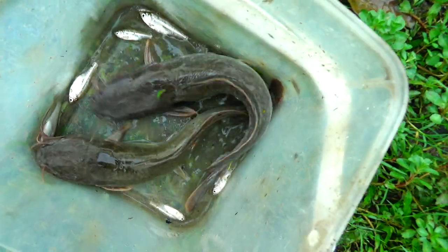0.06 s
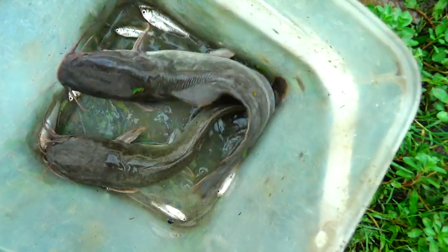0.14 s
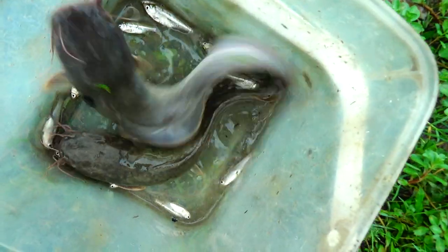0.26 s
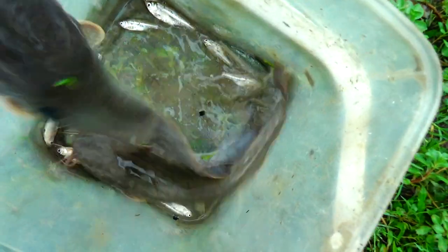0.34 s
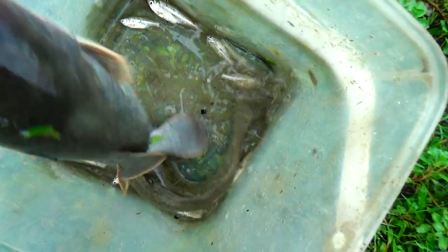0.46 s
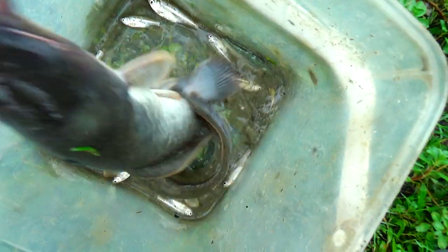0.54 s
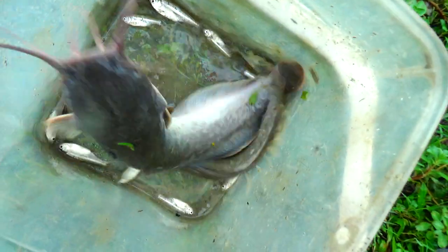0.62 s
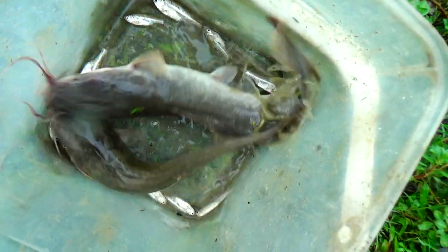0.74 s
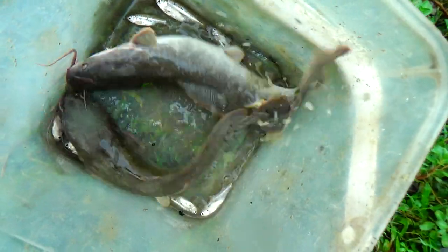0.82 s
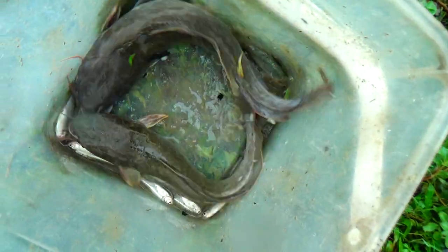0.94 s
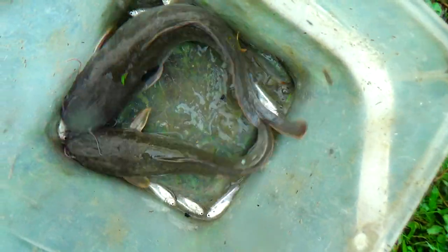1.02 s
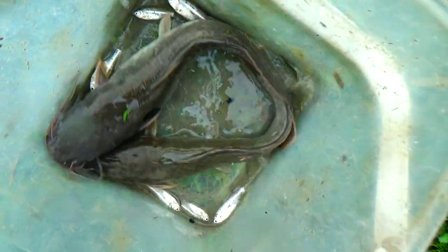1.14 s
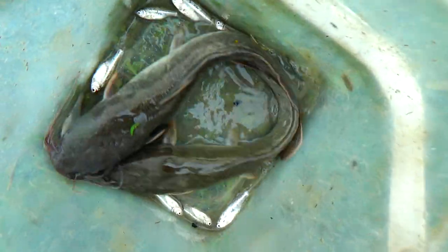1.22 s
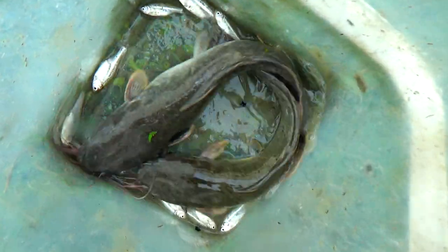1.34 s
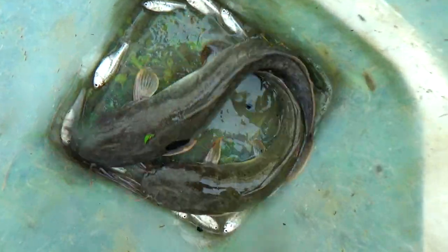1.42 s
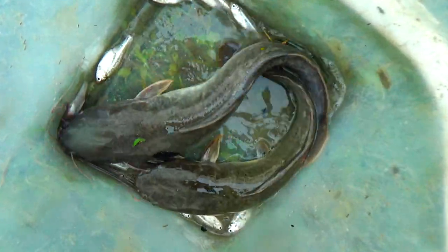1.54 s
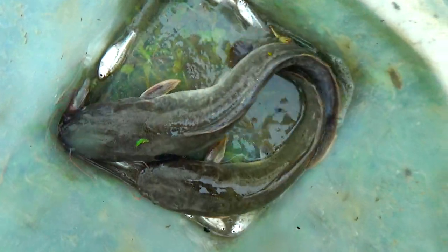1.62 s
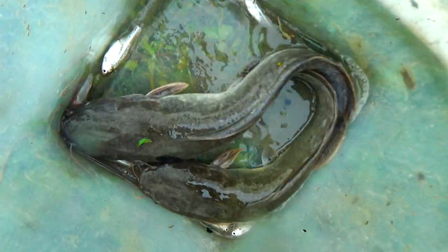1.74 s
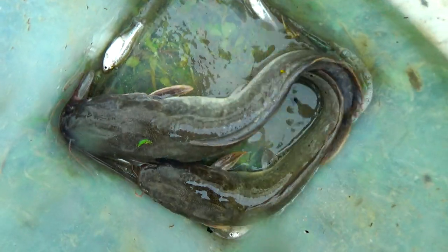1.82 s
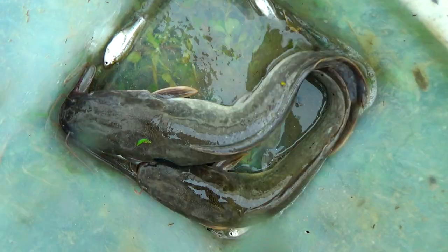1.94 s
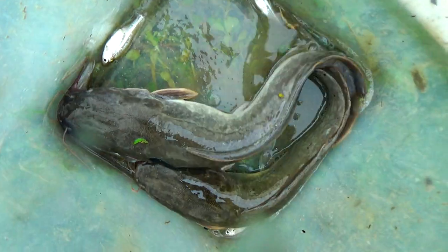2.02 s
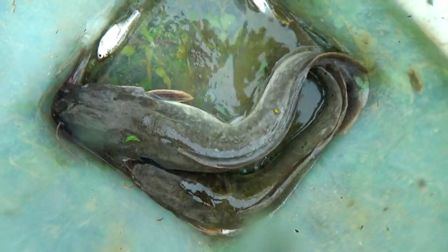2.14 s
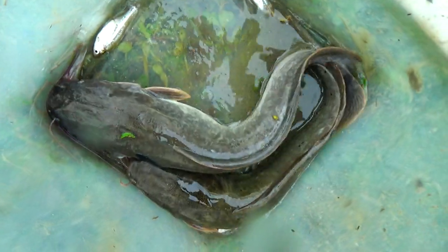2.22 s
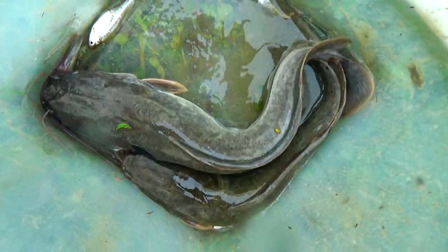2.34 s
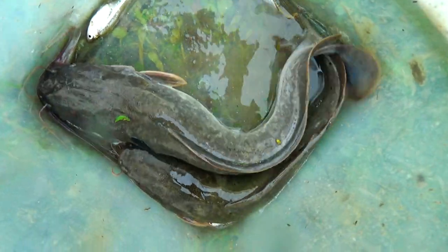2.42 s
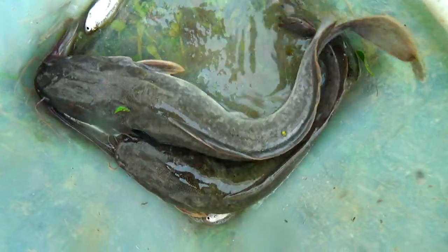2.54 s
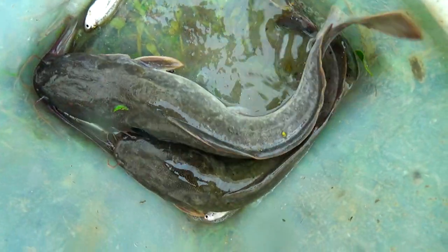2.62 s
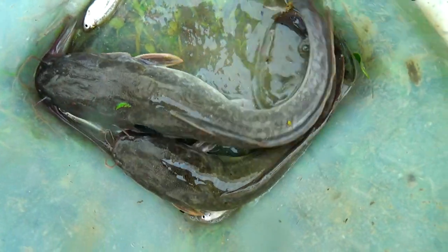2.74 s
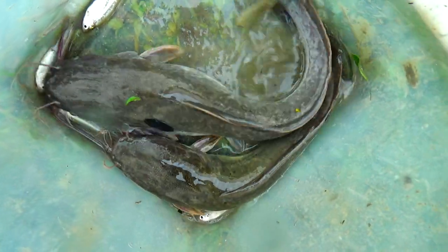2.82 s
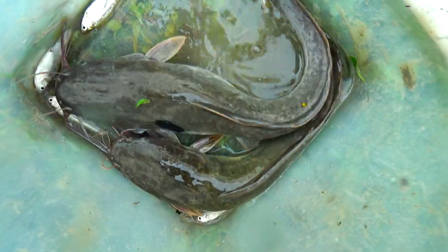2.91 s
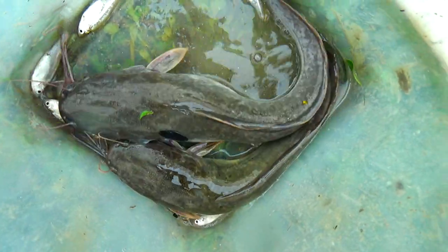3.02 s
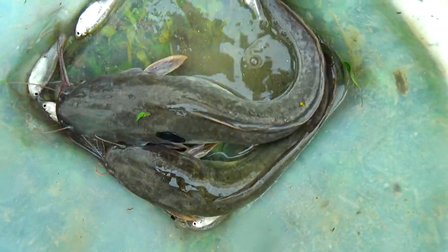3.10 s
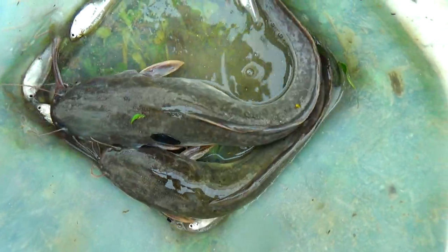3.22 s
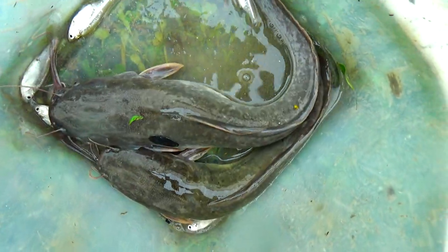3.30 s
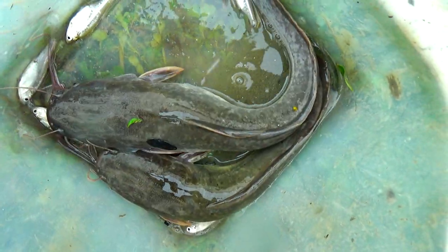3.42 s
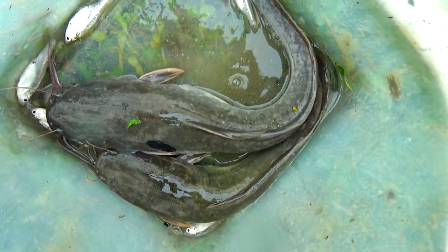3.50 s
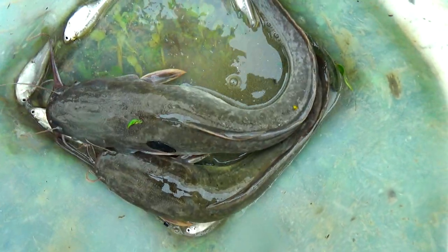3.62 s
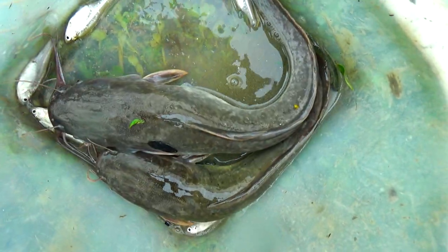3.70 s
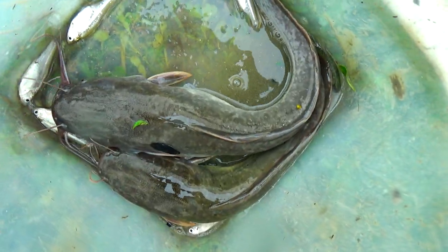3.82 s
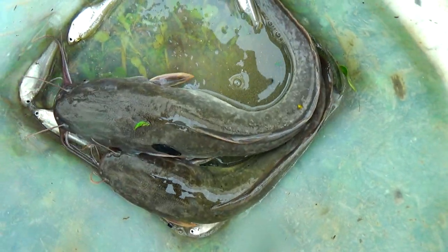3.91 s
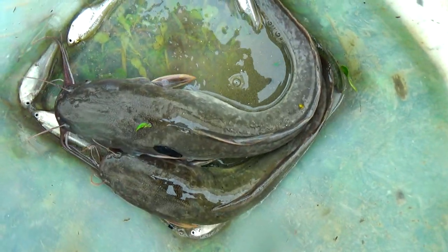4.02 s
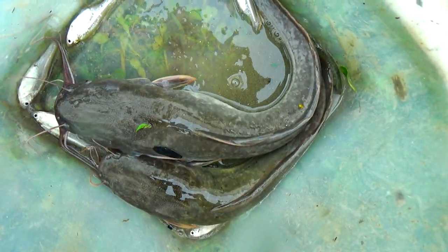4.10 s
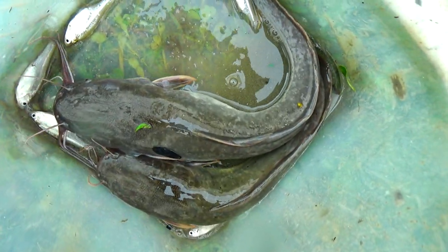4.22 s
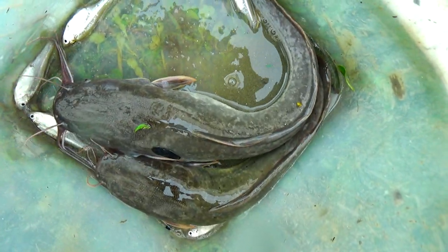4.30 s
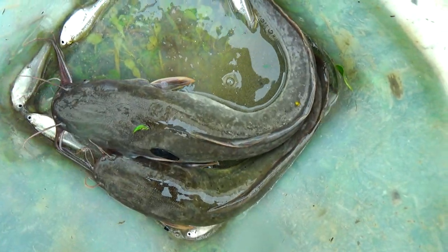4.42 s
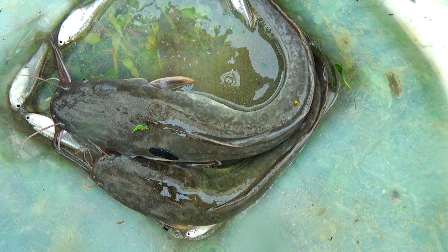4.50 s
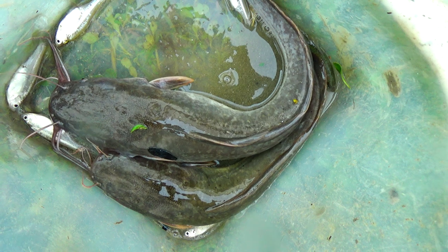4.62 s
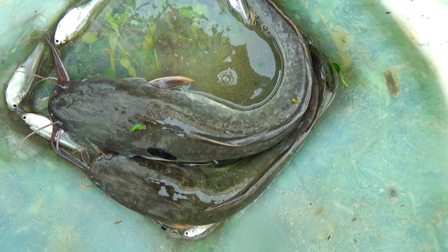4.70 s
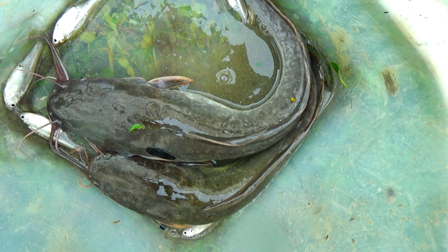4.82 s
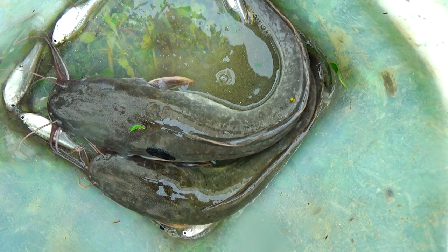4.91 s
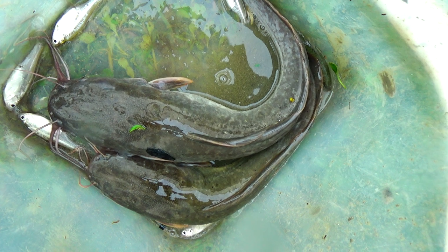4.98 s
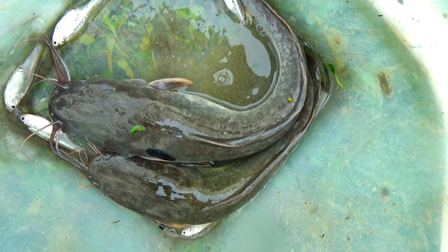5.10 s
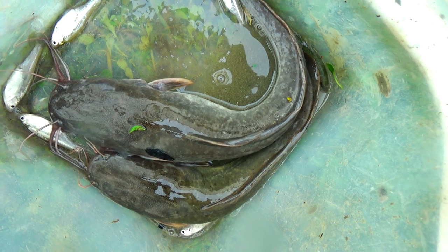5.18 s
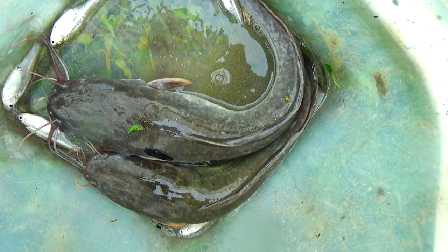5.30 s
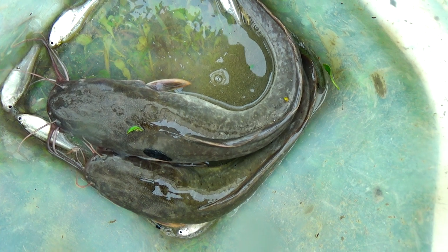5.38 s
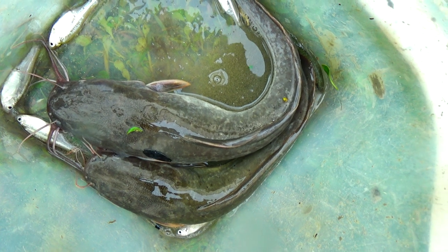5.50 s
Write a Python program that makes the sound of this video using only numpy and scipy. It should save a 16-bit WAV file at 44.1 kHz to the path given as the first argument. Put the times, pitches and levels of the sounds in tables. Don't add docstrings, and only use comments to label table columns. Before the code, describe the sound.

Two big fish thrash violently in a shallow plastic tub with thumps and splashes, then calm to drips while a bird whistles falling notes.

```python
import sys
import numpy as np
from scipy import signal
from scipy.fft import rfft, irfft
from scipy.io import wavfile
from scipy.ndimage import uniform_filter1d

SR = 44100
rng = np.random.default_rng(int(sys.argv[2]) if len(sys.argv) > 2 else 0)


def master(y):
    cut = np.clip(np.atleast_2d(y).T, -1, 1)
    pcm = np.round(cut * 32767)
    wavfile.write(sys.argv[1], SR, pcm.astype(np.int16))


def field_ratio(decibels):
    return 10 ** (np.asarray(decibels, dtype=float) / 20)


N = 244755
TIME = np.arange(N) / SR


def on_log(table, hz):
    points = np.array(table)
    return np.interp(np.log(hz), np.log(points[:, 0]), points[:, 1])


def unit(x):
    return x / np.sqrt(np.mean(x ** 2))


def sides(x, pan_db):
    return x * field_ratio(np.array([[pan_db / 2], [-pan_db / 2]]))


def add(out, s, x):
    i = max(int(s * SR), 0)
    out[..., i:i + x.shape[-1]] += x[..., :N - i]


def band(x, hz, octaves):
    length = x.shape[-1]
    f = np.arange(length // 2 + 1) * SR / length + 1
    bell = np.exp(-0.5 * (np.log2(f / hz) / octaves) ** 2)
    return irfft(rfft(x) * bell, length)


def walk(rate):
    hold = int(SR / rate)
    steps = np.repeat(rng.standard_normal(N // hold + 1), hold)
    return 0.96 * uniform_filter1d(uniform_filter1d(steps, hold), hold)[:N]


def echoes(x, t60, gap_s, spread_db):
    t = np.arange(int(t60 * SR)) / SR
    uneven_db = spread_db * rng.standard_normal((2, len(t)))
    tail = rng.standard_normal((2, len(t))) * field_ratio(uneven_db - 60 * t / t60)
    tail = tail * np.clip(t / gap_s - 1, 0, 1)
    tail = tail / np.sqrt(np.sum(tail ** 2) / 2)
    return signal.fftconvolve(x[None], tail, axes=1)[:, :N]


def field():
    # pitch_hz, level_db (per Hz)
    spectrum = [(20, -24), (40, -11), (65, -3.5), (135, -1.5), (250, -8.5), (340, -7), (480, -16.5),
                (1000, -18.5), (2000, -24.5), (5000, -32), (7500, -34), (9100, -26.5), (11000, -44.5),
                (16000, -41)]
    # pitch_hz, likeness (0-1)
    likeness = [(130, .99), (290, 0.88), (640, 0.21), (1400, 0), (3100, 0.57), (6800, 0.5), (15000, 1)]
    traffic_db = 2.5 - 0.6553 * TIME
    out, swell = 0, walk(1.0)
    for hz in 25 * 2 ** np.arange(0, 9.5, 1 / 3):
        like = np.clip(on_log(likeness, hz), 0, 1)
        mid, side = band(rng.standard_normal((2, N)), hz, octaves=0.18)
        pair = np.sqrt(1 + like) * mid + np.sqrt(1 - like) * side * np.array([[1], [-1]])
        flicker_db = on_log([(100, 3.0), (600, 2.85), (8000, 1.2)], hz) * walk(9)
        out = out + field_ratio(on_log(spectrum, hz) + 0.18 * swell + flicker_db) * pair
    return unit(out) * field_ratio(-47.5 + traffic_db)


def insects():
    # time_s, lift_db, half_length_s
    gusts = [
        (2.146, 12, 0.29),
        (3.59, 9, 0.16),
    ]
    leaves_db = -67.5 + 0.4 * walk(36)
    for s, lift_db, half_s in gusts:
        leaves_db = leaves_db + lift_db * np.exp(-((TIME - s) / half_s) ** 2)
    chorus_db = -71 + 6.5 * np.exp(-((TIME - 3.2) / 0.5) ** 2)
    shimmer_db = 3.2 * walk(39) + 0.8 * walk(5.2)
    hiss = unit(band(rng.standard_normal(N), hz=9870, octaves=0.05))
    leaves = unit(band(rng.standard_normal(N), hz=9000, octaves=0.51))
    return hiss * field_ratio(chorus_db + shimmer_db) + leaves * field_ratio(leaves_db)


def cricket():
    # first_chirp_s, chirps (count), gap_s (between chirps), level_db
    bouts = [(1.273, 1, .1, -60), (1.43, 3, .128, -64), (1.772, 2, .112, -61), (2.022, 9, .1083, -60),
             (3.015, 1, .1, -62), (3.1, 1, .1, -61), (3.5, 1, .1, -63), (3.164, 5, .131, -61),
             (3.778, 3, .114, -62), (4.14, 5, .191, -62), (4.217, 4, .195, -62), (5.04, 5, .119, -64)]
    out, t = np.zeros(N), np.arange(500) / SR
    tick_shape = t / 0.0013 * np.exp(-t / 0.0013)
    chirp_list = [(first + k * gap, db) for first, chirps, gap, db in bouts for k in range(chirps)]
    for s, db in chirp_list:
        db = db + 1.4 * rng.standard_normal()
        for k, chance in enumerate(rng.standard_normal((8, 2))):
            stroke, tooth = divmod(k, 3.5)
            tick = tick_shape * np.sin(2 * np.pi * (9250 - 140 * tooth - 80 * stroke) * t)
            start = s + 0.015 * stroke + 0.0027 * tooth + 0.00068 * chance[0]
            add(out, start, field_ratio(db + 15 + 3.1 * chance[1]) * tick)
    return out + field_ratio(-6) * echoes(out, t60=0.1, gap_s=0.002, spread_db=3)


def whistle(s, hz, db):
    t = np.arange(s[0], s[-1], 1 / SR)
    edge = np.clip(np.minimum(t - s[0], s[-1] - t) / 0.00084, 0, 1)
    pitch = uniform_filter1d(np.interp(t, s, hz), size=200, mode="nearest")
    flutter_db = 3 * unit(uniform_filter1d(rng.standard_normal(SR // 4), size=150))[:len(t)]
    level = field_ratio(np.interp(t, s, db) + 3.0 + flutter_db)
    return pitch, level * edge * np.sin(2 * np.pi * np.cumsum(pitch) / SR)


def bird():
    # time_s, pitch_hz, level_db
    prelude = [
        [(1.226, 4810, -63), (1.243, 4030, -53), (1.3, 3894, -53), (1.331, 2715, -52), (1.347, 2350, -62)],
        [(1.375, 4130, -54), (1.384, 4310, -57), (1.39, 4300, -63)],
        [(1.485, 4215, -56), (1.503, 4080, -53), (1.52, 4654, -60), (1.538, 3510, -47), (1.562, 2370, -61)],
        [(1.69, 4500, -60), (1.715, 4190, -56), (1.742, 4200, -51), (1.752, 4800, -46), (1.776, 4920, -50),
         (1.795, 3940, -60)],
        [(1.91, 4210, -62), (1.95, 4267, -49), (1.966, 4620, -47.5), (1.98, 4850, -55)],
        [(3.91, 1990, -66), (3.925, 2020, -63), (3.96, 2152, -61), (4.05, 2150, -75)],
    ]
    # bend_s, lead_ms (top to bend), top_hz, fall_ms (bend to low resonance), level_db
    falls = [(2.177, 42.4, 5080, 28, -37), (2.365, 15.5, 5870, 44, -39), (2.574, 9.5, 5290, 49, -38.5),
             (2.782, 14.3, 5510, 53, -40.5), (3.006, 18.4, 5380, 44, -39.5), (3.212, 7, 4820, 49, -40.5),
             (3.434, 9.9, 4930, 45, -42), (3.658, 9.4, 5030, 46, -41)]
    # pitch_hz, level_db
    throat = [(1800, -18.5), (2300, -7), (2700, -7), (3400, -9), (3850, 1.5), (4300, -11), (4900, -14),
              (5800, -21)]
    # pitch_hz, width_octaves, level_db
    grove = [(2240, 0.067, -5), (3000, 0.49, -2), (3265, 0.027, 4.5), (3900, 0.012, -12),
             (4345, 0.031, 3.5)]
    song = np.zeros(N)
    for note in prelude:
        add(song, note[0][0], whistle(*np.transpose(note))[1])
    for s, lead_ms, top_hz, fall_ms, db in falls:
        offsets_ms = [-lead_ms, -0.8 * lead_ms, 0, 0.27 * fall_ms, fall_ms, 1.5 * fall_ms]
        times = s + np.array(offsets_ms) / 1000
        glide_hz = [top_hz, 0.2 * top_hz + 3550, 3900, 3150, 2300, 1800]
        pitch, note = whistle(times, glide_hz, np.full(6, db))
        add(song, times[0], note * field_ratio(on_log(throat, pitch)))
    wash = echoes(song, t60=1.56, gap_s=0.012, spread_db=8.5)
    held = sum(field_ratio(db) * band(wash, hz, octaves) for hz, octaves, db in grove)
    near = field_ratio(1.5) * echoes(song, t60=0.065, gap_s=0.00055, spread_db=3)
    return sides(field_ratio(0.05) * song + near, pan_db=-4.5) + field_ratio(-2.0) * held


def churn():
    # time_s, level_db
    flails = [(.03, -50), (.19, -46.5), (0.236, -38.5), (0.344, -27.5), (.41, -30.5), (0.469, -33),
              (0.542, -35), (0.646, -27.5), (0.718, -25.5), (0.806, -28), (.925, -36)]
    flail_s, flail_db = np.transpose(flails)[:, :, None]
    since = TIME - flail_s
    each = flail_db + np.minimum(294 * since, -169 * since)
    ripples_db = -53.5 - 15 * np.maximum(TIME - 1, 0)
    return np.maximum(each.max(axis=0), ripples_db)


def splashes(events, octaves, bubble, cycles, rough_db, gain_db):
    out, t = np.zeros((2, N)), np.arange(2560) / SR
    later = np.arange(5)[:, None] > 0
    for s, hz, db, t60_ms in events:
        hiss, chance = rng.standard_normal((2, len(t))), rng.standard_normal((3, 5, 1))
        shape = np.clip(t / 0.00068, 0, 1) * field_ratio(-60e3 * t / t60_ms)
        ragged = field_ratio(rough_db * unit(uniform_filter1d(hiss[1], size=40)))
        burst = unit(band(hiss[0], hz, octaves)) * ragged
        f = np.minimum(hz * 2 ** (0.698 * octaves * later * chance[0]), 14000)
        start = later * np.abs(chance[1]) * t60_ms * 0.00014
        age = np.maximum(t - start, 0) * f / cycles
        level = field_ratio(-9 * later - 17000.0 * start / t60_ms)
        notes = level * np.exp(-age) * np.sin(2 * np.pi * cycles * (age + 0.039 * age ** 2))
        splash = shape * burst + bubble * notes.sum(axis=0)
        splash = splash / np.sqrt(uniform_filter1d(splash ** 2, size=80).max())
        add(out, s, sides(field_ratio(db + gain_db) * splash, pan_db=0.6 + 0.61 * chance[2, 0, 0]))
    return out


def froth(db, hz, octaves, rate, cycles, spread_db):
    count = int(rate * 1.4)
    starts = rng.random(count) * 1.4
    size = rng.exponential(size=count)
    out, t = np.zeros(N), np.arange(512) / SR
    f = np.clip(hz * 2 ** (octaves * rng.standard_normal(count)), 300, 15500)[:, None]
    notes = np.exp(-t * f / cycles) * np.sin(2 * np.pi * f * t * (1 + 0.014 * f * t / cycles))
    grains = field_ratio(spread_db * size)[:, None] * notes
    for start, grain in zip(starts, grains):
        add(out, start, grain)
    return out / np.sqrt(np.mean(out[:SR] ** 2)) * field_ratio(db)


def water(churn_db):
    # time_s, pitch_hz, level_db, fade_ms (by 60 dB)
    slap_events = [(.009, 3220, -38.5, 20), (0.043, 835, -32, 58), (.105, 4400, -50.5, 53),
                   (0.0441, 3320, -21.5, 28), (0.159, 1820, -22.5, 14), (0.1635, 917, -20, 13.3),
                   (.166, 1780, -32, 110), (0.3256, 3000, -20.5, 39), (0.3448, 5070, -14.5, 47),
                   (0.3649, 780, -25, 25.5), (0.3722, 1840, -22, 280), (0.3985, 2390, -27, 140),
                   (0.4505, 2010, -24, 77), (.3895, 1800, -26, 30), (.418, 3020, -27, 23),
                   (.4815, 3890, -35, 30), (.4985, 2760, -21.5, 30), (.5305, 2070, -35, 30),
                   (.5955, 2640, -21, 17), (.6375, 3400, -24, 22), (.672, 3100, -20.5, 35),
                   (.703, 2050, -20, 25), (.7145, 2400, -20, 32), (.7402, 764, -15, 26),
                   (.7605, 1660, -26, 43.7), (.8272, 1360, -26, 27), (0.4907, 4340, -31, 48),
                   (0.5056, 2080, -16.5, 30), (0.5065, 800, -18, 26.3), (0.5569, 3750, -16, 19),
                   (0.6035, 4540, -12.5, 24), (0.6266, 3480, -20.5, 50), (0.6474, 2580, -15.5, 66),
                   (0.658, 2460, -15, 60), (0.6795, 2360, -19, 53), (0.7078, 1900, -14, 45),
                   (0.7234, 3440, -14.5, 64), (0.729, 830, -18, 57), (0.7684, 4560, -27.5, 75),
                   (0.7927, 1730, -14, 31), (0.8082, 870, -17, 65), (0.8159, 3220, -16.5, 28),
                   (0.8911, 2260, -25.5, 24), (0.918, 4660, -30.5, 44), (0.945, 2870, -46, 590),
                   (0.9562, 1040, -31.5, 66)]
    # time_s, pitch_hz, level_db
    pop_events = [(0.9872, 3720, -39.5), (1.073, 1580, -42.5), (1.1499, 1005, -36), (1.2226, 770, -44.5),
                  (1.388, 2100, -39), (1.47, 1700, -32.5), (1.5216, 3000, -37.5), (1.8193, 1900, -47),
                  (1.9166, 1780, -37), (2.1096, 1650, -45), (2.5412, 2940, -39), (2.8152, 2750, -32),
                  (2.8563, 3000, -28), (3.0492, 860, -39), (4.0532, 4150, -51), (5.01, 1000, -44.5),
                  (5.319, 1840, -43), (5.4107, 1120, -47), (5.421, 1370, -44), (5.4503, 900, -39.5),
                  (5.451, 2620, -50), (5.411, 3000, -56), (1.679, 2600, -45), (2.5288, 3000, -42),
                  (4.396, 2500, -52.5), (1.403, 800, -45), (5.01, 2760, -51), (5.417, 4200, -51)]
    # time_s, pitch_hz, level_db
    spray_events = [(0.0358, 8100, -22.5), (0.0454, 9800, -22), (0.0515, 9500, -26.5), (0.1593, 4500, -38),
                    (0.163, 8200, -34), (0.2576, 7600, -17), (0.3174, 9260, -14.5), (0.3264, 8900, -18),
                    (0.345, 4800, -23), (0.3729, 9100, -13), (0.3909, 5400, -15), (0.402, 8600, -13.5),
                    (0.426, 8290, -26.6), (0.4335, 7450, -26), (0.4396, 9600, -20.5), (0.4568, 9500, -27.7),
                    (0.4633, 9700, -31), (0.4682, 9450, -30), (0.4984, 9500, -18), (0.507, 8850, -17.5),
                    (0.5303, 8600, -20), (0.5361, 9650, -19.5), (0.5413, 8600, -18), (0.556, 8560, -16),
                    (0.578, 7940, -17.5), (0.604, 4470, -19.5), (0.6273, 8700, -13), (0.636, 9350, -18),
                    (0.6501, 6400, -22), (0.6615, 7860, -20), (0.666, 8000, -14.5), (0.6716, 7700, -13),
                    (0.6808, 9400, -15), (0.697, 8800, -21.3), (0.7034, 5600, -17), (0.7085, 8700, -14.5),
                    (0.7155, 9090, -27), (0.725, 5450, -32), (0.7314, 12250, -21), (0.7414, 6600, -21),
                    (0.7484, 9500, -15), (0.7673, 4500, -25.4), (0.782, 8160, -21), (0.787, 5000, -22),
                    (0.7931, 6650, -15), (0.8003, 8100, -11.5), (0.8073, 6200, -16), (0.8161, 4300, -14.5),
                    (0.8267, 7140, -22.4), (0.835, 6560, -19.5), (0.846, 6740, -19.5), (0.8734, 7900, -11),
                    (0.886, 6460, -25), (0.9131, 7240, -24.5), (0.9189, 10600, -24), (0.926, 9500, -25),
                    (0.9336, 9170, -20), (0.9478, 9400, -19), (0.9813, 9300, -33), (0.9869, 8360, -19.8)]
    # time_s, pitch_hz, level_db
    drip_events = [(.0166, 8300, -32), (0.0384, 8260, -21), (.2993, 4930, -25), (.3138, 8550, -13.5),
                   (0.3472, 9000, -12), (0.398, 9000, -13), (0.7454, 9300, -12), (1.011, 8700, -32),
                   (1.0435, 9450, -35), (1.0646, 6900, -36), (1.0782, 9700, -34), (1.1491, 7700, -27),
                   (1.1633, 8200, -32), (1.2164, 7850, -42), (1.387, 9300, -40), (1.472, 7200, -39.5),
                   (1.5137, 9400, -33), (1.5227, 7900, -35), (1.59, 8000, -40), (1.7433, 6680, -43),
                   (1.77, 8800, -38), (1.915, 7000, -41.5), (2.3265, 7700, -43), (2.4832, 9000, -39.5),
                   (2.5413, 7560, -21), (2.574, 10000, -43), (2.7982, 9700, -24.5), (2.815, 7400, -28),
                   (2.833, 9800, -26), (2.857, 9000, -20), (2.8796, 6500, -41), (3.031, 5800, -41),
                   (3.05, 9540, -31), (3.5943, 9000, -35), (3.6851, 8000, -39), (4.053, 7050, -33.5),
                   (5.4584, 8800, -38)]
    # time_s, pitch_hz, level_db
    foam_events = [(1.0047, 10700, -45.9), (1.299, 10400, -53), (1.3289, 7600, -49.5), (1.3571, 10500, -52),
                   (1.4544, 12200, -54), (1.4878, 8200, -44), (1.5046, 10400, -46), (1.5323, 8200, -45),
                   (1.5593, 6500, -52.8), (1.6816, 6940, -43.5), (1.8201, 8040, -52.1),
                   (1.8497, 12500, -47.4), (2.3493, 5570, -53), (2.363, 8200, -43), (2.3966, 8200, -49),
                   (2.4563, 7000, -53.8), (2.474, 7800, -55), (2.5289, 6000, -71), (2.5491, 7200, -53.4),
                   (2.6359, 8260, -52), (2.705, 7900, -54), (2.7645, 7560, -52), (2.7779, 8200, -52),
                   (2.8222, 6900, -47.6), (2.913, 8200, -42), (3.0921, 6340, -45), (3.1283, 8000, -51),
                   (3.2435, 7900, -60), (3.3546, 7800, -53.4), (3.3967, 7800, -53.0), (3.468, 8000, -52),
                   (3.8234, 10400, -50), (3.9288, 7900, -54.2), (3.978, 10800, -61), (4.0217, 8200, -60),
                   (4.1974, 8200, -52), (4.4057, 10400, -60.3), (4.4135, 6300, -62), (4.7904, 10500, -59.4),
                   (4.8483, 6200, -54), (5.01, 6300, -60), (5.3315, 8250, -51), (5.4126, 7600, -56.9),
                   (5.4708, 10900, -57.2), (5.5392, 12800, -52.2)]
    pops = [(s, hz, db, 34) for s, hz, db in pop_events]
    slaps = splashes(slap_events + pops, octaves=0.65, bubble=1.0, cycles=3.7, rough_db=5.5, gain_db=-2.5)

    spray = [(s, hz, db, max(19 + 0.5 * (db + 14.5), 6)) for s, hz, db in spray_events]
    drops = splashes(spray, octaves=0.32, bubble=1.0, cycles=7.2, rough_db=4.5, gain_db=-3.0)

    fall_s, fade_ms = 0.00063, 11
    lone = [(s + fall_s, hz, db, fade_ms) for s, hz, db in drip_events]
    lone += [(s, hz, db + 3.5, fade_ms) for s, hz, db in foam_events]
    drops = drops + splashes(lone, octaves=0.46, bubble=3.8, cycles=5.3, rough_db=7.0, gain_db=-3.5)

    slosh = froth(churn_db - 4.5, hz=2500, octaves=0.702, rate=1200, cycles=4.5, spread_db=3.0)
    fizz = froth(1.097 * churn_db + 2.5, hz=8500, octaves=0.435, rate=2400, cycles=3.1, spread_db=4.0)
    spatter = froth(1.05 * churn_db - 20, hz=7000, octaves=0.46, rate=260, cycles=7.8, spread_db=2.5)
    near = slaps + drops + slosh + fizz + spatter
    walls = echoes(near.mean(axis=0), t60=0.05, gap_s=0.0008, spread_db=4)
    return near + field_ratio(-8.5) * band(walls, hz=3000, octaves=2.24)


def ring(modes, push_s, free):
    t = np.arange(SR // 3) / SR
    bell = 0
    for hz, db, t60 in modes:
        bell = bell + field_ratio(db - 60 * t / (t60 * max(free, 0.05))) * np.sin(2 * np.pi * hz * t)
    push = np.sin(np.pi * np.clip(t[:400] / push_s, 0, 1))
    bell = np.convolve(bell, push)[:len(t)]
    return -bell / np.abs(bell).max()


def tub(churn_db):
    # time_s, boom_db, knock_db, free (freedom to ring, 0-1)
    blows = [(.042, -64, -23.5, 0.41), (0.1837, -6.5, -9, 0.5), (.191, -12.5, -5, 0.53),
             (.325, -14, -12.5, 0), (0.333, -7.5, -21, 0.26), (0.362, -39, -11, 0.02),
             (0.412, -23.5, -27, 0.9), (0.43, -22.5, -34, 0.5), (0.507, -33, -14, 0.87),
             (.570, -70, -15.5, 0.6), (0.692, -19.5, -20, 0.28), (0.74, -28, -15, 0.5),
             (.757, -22, -20.5, 0.77), (.808, -39, -9.5, 0.62), (0.829, -18, -26, 0.24),
             (0.848, -21, -20, 0.5), (0.928, -52, -25, 0), (2.8216, -59, -23, 0.35),
             (2.8268, -53, -23, 0.54), (4.227, -46, -37.5, 0.6), (5.008, -48, -38, 1)]
    # pitch_hz, level_db, fade_s (by 60 dB)
    boom_modes = [
        (107.8, -6, 0.4),
        (185, -3.5, 0.16),
    ]
    # pitch_hz, level_db, fade_s (by 60 dB)
    knock_modes = [
        (346, 12.5, 0.083),
        (403, -6.5, 0.15),
        (520, -6.5, 0.104),
        (800, -10.5, 0.089),
    ]
    boom, knock = np.zeros((2, N))
    for s, boom_db, knock_db, free in blows:
        add(boom, s - 0.0018, field_ratio(boom_db) * ring(boom_modes, 0.0026, free))
        add(knock, s, field_ratio(knock_db) * ring(knock_modes, 0.00062, free))
    rumble_db = np.where(TIME < 1.3, 0.79 * churn_db - 11.5, -120)
    shake = rng.standard_normal(N) * field_ratio(rumble_db + 5 * walk(40))
    low, high = band(shake, hz=128.0, octaves=0.19), band(shake, hz=337, octaves=0.58)
    wall = sides(boom + field_ratio(24) * low, pan_db=7.5) + sides(knock + field_ratio(17) * high, pan_db=3.5)
    wall[1] = np.roll(wall[1], shift=11)
    return signal.sosfilt(signal.butter(2, 65, "high", fs=SR, output="sos"), wall)


def scene():
    churn_db = churn()
    background = field() + insects() + cricket() + bird()
    return background + water(churn_db) + tub(churn_db)


def top_cut(x):
    return signal.sosfilt(signal.butter(12, 16810, fs=SR, output="sos"), x)


def record(dry):
    dull = signal.sosfilt(signal.butter(1, 18000, fs=SR, output="sos"), dry)
    rounded = np.tanh(1.1 * dull) / 1.1
    finished = signal.sosfilt(signal.ellip(8, 0.3, 50, 15750, fs=SR, output="sos"), rounded)
    return top_cut(finished)


dry = scene()
out = record(dry)
master(out)
```